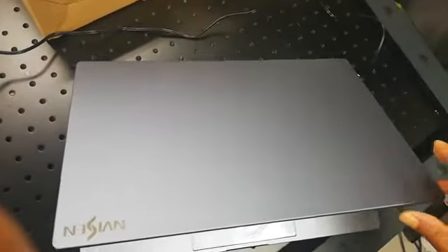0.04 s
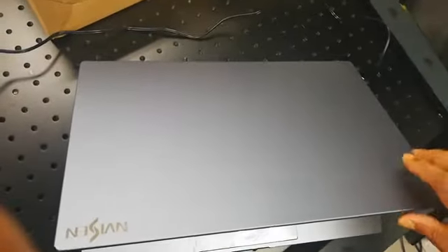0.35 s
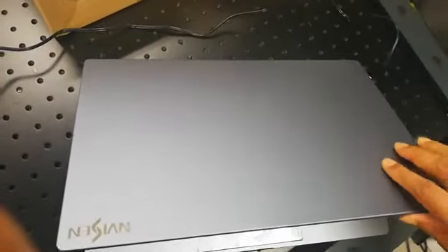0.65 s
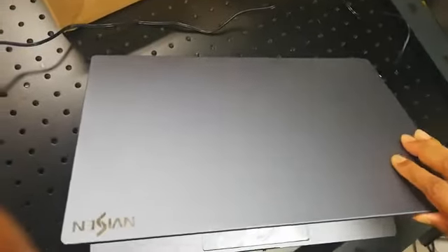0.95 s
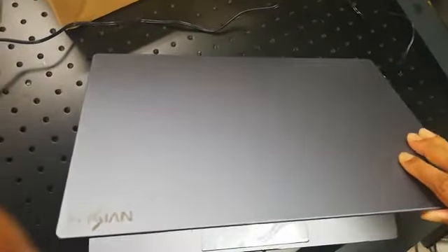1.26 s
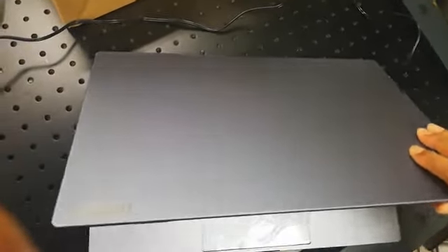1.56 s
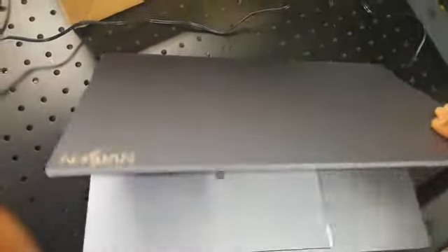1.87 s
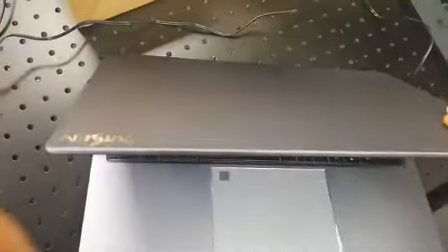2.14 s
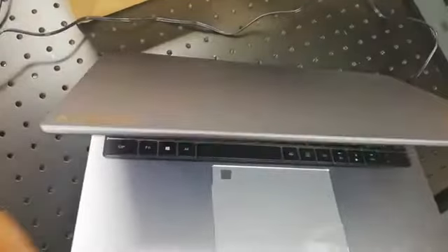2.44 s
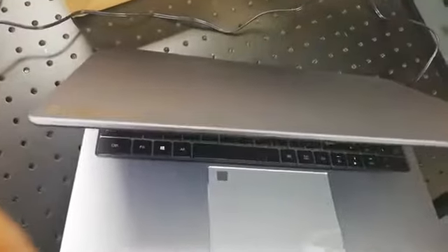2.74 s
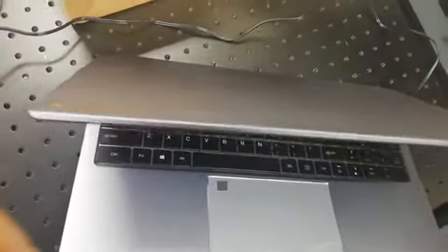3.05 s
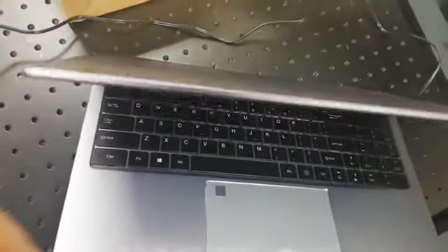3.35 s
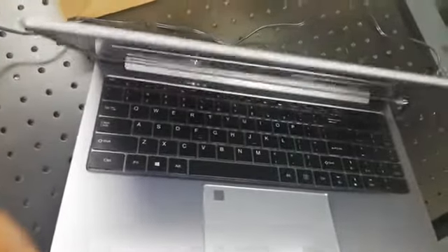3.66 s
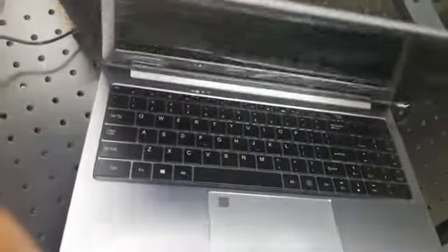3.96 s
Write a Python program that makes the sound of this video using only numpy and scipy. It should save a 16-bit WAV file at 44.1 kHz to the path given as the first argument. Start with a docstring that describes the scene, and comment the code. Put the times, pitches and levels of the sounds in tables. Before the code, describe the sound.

A laptop fan whirs, then winds down, with faint handling noises in a quiet room.

```python
"""A laptop's cooling fan whirs: air rushes through its duct, the blades sing a thin tone, the outlet
whistles faintly. Fingers start to brush the case, then the fan loses power and coasts down, its tones
falling and its air growing dull and quiet. The hinge rubs as the lid is lifted, the base knocks on the
table with a quick double contact, and the hinge rubs again. Under it all lie the ventilation rumble,
hiss and faint hums of a quiet room."""
import sys
import numpy as np
from scipy.fft import rfft, irfft
from scipy.io import wavfile

SR = 44100
rng = np.random.default_rng(int(sys.argv[2]) if len(sys.argv) > 2 else 0)


def output_pcm(signal):
    """Save a mono or channel-first signal as 16-bit PCM at the path in sys.argv[1].

    Samples are clipped to [-1, 1] before scaling.
    """
    pcm = np.clip(np.atleast_2d(signal).T, -1, 1) * 32767
    wavfile.write(sys.argv[1], SR, np.round(pcm).astype(np.int16))


N = 176400

# bright colour of a light touch on the case: freq_hz, relative_db
TOUCH_COLOUR = [(1000, -13), (4500, -9), (7000, -8), (8400, 0), (10800, 0), (12300, -13), (15000, -21)]
# stereo image of the room: freq_hz, correlation (-1..1), left_over_right_db
ROOM_IMAGE = [(45, 1, 0), (75, .998, 0), (120, .984, 0), (200, .92, -.4), (370, .14, 0), (690, -.5, .1),
              (1200, .12, -.4), (2300, -.11, 0), (8000, -.09, .3)]


def undb(db):
    """Decibels to gain."""
    return 10 ** (np.asarray(db) / 20)


def times():
    """Time of every sample in s."""
    return np.arange(N) / SR


def freqs():
    """Frequency of every spectral bin in Hz."""
    return np.maximum(np.arange(N // 2 + 1) * SR / N, 1)


def along(table):
    """Each column of a table joined by straight lines over log frequency."""
    hz, *columns = np.array(table, float).T
    return [np.interp(np.log(freqs()), np.log(np.sort(hz)), column) for column in columns]


def lifts(modes, at_hz):
    """Gain in dB of a set of resonances at the given frequencies."""
    return sum(db / (1 + (2 * (at_hz - hz) / width) ** 2) for hz, width, db in modes)


def highpass(hz):
    """Gain in dB of a steep bass cut."""
    return -10 * np.log10(1 + (hz / freqs()) ** 8)


def lowpass(hz):
    """Gain in dB of a steep treble cut."""
    return -10 * np.log10(1 + (freqs() / hz) ** 8)


def noise(colour_db, image=None):
    """Stereo coloured noise at rms 1; the image sets its width and balance."""
    correlation, pan_db = along(image) if image else (0, 0)
    correlation = np.clip(correlation, -1, 1)
    mid, side = rfft(rng.standard_normal((2, N)))
    sign = np.array([[1], [-1]])
    spectrum = mid * np.sqrt(1 + correlation) + sign * side * np.sqrt(1 - correlation)
    x = irfft(spectrum * undb(colour_db + sign * pan_db / 2), N)
    return x / x.std()


def drift(rate_hz):
    """Smooth random movement with spread 1."""
    x = irfft(rfft(rng.standard_normal(N)) / (1 + (freqs() / rate_hz) ** 4), N)
    return (x - x.mean()) / x.std()


def fader(table):
    """Gain that rides through points of time_s, gain_db."""
    return undb(np.interp(times(), *np.array(table, float).T))


def strike(start_s, t60_s, attack_s):
    """Envelope of a blow: quick rise, exponential fall."""
    age = np.maximum(times() - start_s, 0)
    return np.minimum(age / attack_s, 1) * np.exp(-np.log(1000) * age / t60_s)


def strokes(table, rise=.2, release=.55):
    """Envelope of short swells; rise and release are shares of their length."""
    t, envelope = times(), 0
    for start, length, db in table:
        fade_in = np.clip((t - start) / (rise * length), 0, 1)
        fade_out = np.clip((start + length - t) / (release * length), 0, 1)
        envelope += undb(db) * fade_in * fade_out
    return envelope


def fan_speed(power_off_s=1.148, drag_halving_s=1.0, friction_per_s=.024, wobble=.0005):
    """Share of full speed: steady until the power goes off, then air drag and the bearing brake it."""
    coasting_s = np.maximum(times() - power_off_s, 0)
    return (1 + wobble * drift(5)) / (1 + coasting_s / drag_halving_s) - friction_per_s * coasting_s


def fan_air(speed, level_db=-58, fall_db_per_decade=63.5, dulling_db_per_decade=59, split_hz=4400):
    """Turbulence rushes through the duct, weaker and duller as the fan slows."""
    # rushing air at full speed: freq_hz, relative_db
    colour = [(300, -11.5), (620, -7), (760, -1.2), (1100, -6.5), (1450, -7), (2300, -2.5), (3300, -0.5),
              (3900, -5), (5400, -3), (6400, -7.5), (7800, -8.5), (10000, -11.5), (11200, -19.5),
              (15000, -27)]
    # duct resonances: freq_hz, width_hz, lift_db
    duct_modes = [(717, 16, 4.5), (836, 26, 2.5), (976, 21, 3), (1240, 100, 5), (1446, 220, 6.5),
                  (1580, 50, 4), (1805, 70, 3), (2080, 80, 4), (2500, 53, 2), (2850, 38, 1.5),
                  (3380, 83, 0.5), (4220, 150, 0.5), (4610, 190, 2), (4950, 110, 0), (5760, 130, 0)]
    # stereo image of the air: freq_hz, correlation (-1..1), left_over_right_db
    image = [(570, -0.22, 4), (1293, 0.76, -2), (2500, -0.58, 1.5), (3480, 0.13, -2), (4330, -0.035, 4),
             (8000, -0.12, 1.5), (14100, 0.35, 5)]
    # slight swell and dip as the hand comes near: time_s, gain_db
    hand_ride = [(0, -0.9), (.55, -0.6), (.75, -0.2), (1.15, -1.3)]
    air = noise(along(colour)[0] + lifts(duct_modes, freqs()) + highpass(240), image)
    low = irfft(rfft(air) / (1 + (freqs() / split_hz) ** 2), N)
    decades = np.log10(speed)
    treble = (air - low) * undb(dulling_db_per_decade * decades)
    return (low + treble) * undb(level_db + fall_db_per_decade * decades) * fader(hand_ride)


def fan_tones(speed, full_speed_hz=2534, flutter_db=1.1):
    """Blades passing the outlet sing fluttering harmonics, coloured by the case as they fall."""
    # blade tones ahead of the case's colour: harmonic, level_db, fall_db_per_decade, left_over_right_db
    harmonics = [(1, -72.6, 56, -1.5), (2, -72.8, 102, 5), (3, -86, 110, .5)]
    # peaks and dips of the case: freq_hz, width_hz, lift_db
    case_modes = [(1430, 170, 5.5), (1570, 70, -6), (1950, 240, 2.5), (2175, 60, -8), (2385, 45, -10),
                  (4270, 240, -17), (4520, 220, 5.5), (4760, 130, 3), (4945, 60, -14)]
    # reflections shift the phase between left and right: pitch_hz, phase_rad
    stereo_phase = [(1300, .6), (1500, .2), (1580, 2.6), (1770, 2.6), (1860, 1), (2100, .5), (2220, 3),
                    (2550, 3), (4400, 2), (4580, 1.5), (4780, .2), (5070, .9), (7600, .7)]
    blade_hz = full_speed_hz * speed
    phase = 2 * np.pi * np.cumsum(blade_hz) / SR
    sign, tones = np.array([[1], [-1]]), 0
    for k, db, fall_db, pan_db in harmonics:
        lag = np.interp(k * blade_hz, *np.array(stereo_phase).T)
        level_db = db + fall_db * np.log10(speed) + lifts(case_modes, k * blade_hz)
        level_db += flutter_db * drift(12)
        tones += np.sqrt(2) * undb(level_db + sign * pan_db / 2) * np.sin(k * phase + sign * lag / 2)
    return tones


def outlet_whistles(speed, wander=.005, flutter_db=4, fall_db_per_decade=130, flare_hz=4610):
    """Air whistles faintly over the outlet's edges; the tones come and go, and die with the flow."""
    # edge tones at full speed: pitch_hz, level_db
    edge_tones = [(733, -81), (981, -81.5), (1416, -81), (1500, -81), (2060, -84), (2650, -84), (3388, -82),
                  (4590, -84.5)]

    def whistle(hz):
        """A tone whose pitch and stereo phase wander."""
        phase = 2 * np.pi * np.cumsum(hz * (1 + wander * drift(7))) / SR
        return np.sqrt(2) * np.sin(phase + np.array([drift(6), drift(6)]) / 2)

    chorus = sum(whistle(hz) * undb(db + flutter_db * np.tanh(drift(6))) for hz, db in edge_tones)
    # the top whistle flares while the hand is by the outlet: start_s, length_s, level_db
    flare = whistle(flare_hz) * strokes([(.91, .13, -73)])
    return (chorus + flare) * undb(fall_db_per_decade * np.log10(speed))


def finger_brushes(grain_db=2):
    """Fingers slide over the case in short, bright, grainy wisps."""
    # finger strokes: start_s, length_s, level_db
    brushes = [(.715, .09, -70), (.815, .055, -70), (.945, .04, -72), (1.283, .035, -71.5),
               (2.032, .031, -65), (2.298, .03, -74), (3.285, .04, -72), (3.45, .028, -74)]
    friction = noise(along(TOUCH_COLOUR)[0] + highpass(600))
    return friction * strokes(brushes) * undb(grain_db * drift(300))


def hinge_rubs(grain_db=2):
    """Friction excites the hinge's resonances as the lid rises."""
    # hinge movements: start_s, length_s, level_db
    rubs = [(2.285, .07, -67.8), (3.25, .1, -70.5)]
    # hinge resonances: freq_hz, width_hz, lift_db
    hinge_modes = [(1785, 130, 17), (3400, 500, 3.5), (7600, 480, 7), (9500, 1400, 5)]
    friction = noise(lifts(hinge_modes, freqs()) + highpass(900) + lowpass(7100))
    return friction * strokes(rubs) * undb(grain_db * drift(150))


def base_knock(thump_db=-48.7, scuff_db=-61, tick_db=-60.5):
    """The base settles on the table in two quick contacts: soft thumps, dull scuffs and a tick."""
    # low resonances of the base: freq_hz, width_hz, lift_db
    base_modes = [(125, 70, 18), (190, 55, 13), (255, 70, 7.5), (360, 75, 7)]
    # contacts with the table: start_s, thump_trim_db, scuff_trim_db
    contacts = [(2.547, -3, 0), (2.566, 0, -6)]
    thump = noise(lifts(base_modes, freqs()) + highpass(88) + lowpass(420), ROOM_IMAGE)
    thump *= sum(undb(thump_db + db) * strike(s, t60_s=.15, attack_s=.006) for s, db, _ in contacts)
    scuff = noise(highpass(330) + lowpass(1300))
    scuff *= sum(undb(scuff_db + db) * strike(s, t60_s=.1, attack_s=.0035) for s, _, db in contacts)
    tick = noise(along(TOUCH_COLOUR)[0] + highpass(600))
    tick *= undb(tick_db) * strike(start_s=2.556, t60_s=.018, attack_s=.00071)
    return thump + scuff + tick


def ventilation(rumble_db=-53, hiss_db=-65.5, motor_hz=48.25, motor_db=-52, waver_db=1.7):
    """The ventilation's rumble and motor drone swell together under an even, hollow hiss."""
    # deep rumble: freq_hz, relative_db
    rumble_colour = [(18, -13), (28, -0.2), (34, -7.5), (46, -3), (60, -9.5), (71, -7), (87, -14.5),
                     (108, -15.5), (127, -9), (150, -17), (195, -14), (215, -21.5), (280, -30), (400, -36)]
    # slow swell of rumble and drone: time_s, gain_db
    swell = [(0, -1.2), (.8, -1.1), (1.25, 0.9), (1.75, -2), (2.2, -0.3), (2.8, -0.5), (3.1, 0.5),
             (3.55, 0.9), (4, 0.5)]
    # room hiss: freq_hz, relative_db
    hiss_colour = [(250, 1.5), (400, -1), (620, -9.5), (850, -4), (1150, -4), (1400, -5), (1800, -7),
                   (3200, -8.5), (4700, -9.5), (5600, -11), (10000, -11.5), (11300, -16), (15000, -17.5)]
    # hollow resonances in the hiss: freq_hz, width_hz, lift_db
    vent_modes = [(498, 9.2, 10.5), (545, 12.6, 10), (577, 19, 10), (700, 110, 5.5), (713, 24, 4.5),
                  (825, 8.9, 6), (1203, 86, 0)]
    rumble = noise(along(rumble_colour)[0] + highpass(7.5) + lowpass(340), ROOM_IMAGE)
    hiss = noise(along(hiss_colour)[0] + lifts(vent_modes, freqs()) + highpass(243), ROOM_IMAGE)
    motor_gain = np.sqrt(2) * undb(motor_db + waver_db * drift(2.5))
    motor = motor_gain * np.sin(2 * np.pi * motor_hz * times() + .11 * drift(.91))
    return (undb(rumble_db) * rumble + motor) * fader(swell) + undb(hiss_db) * hiss


def machine_hums(waver_db=3, drift_rad=.2):
    """Machines in the room hum faintly, each wavering in level and phase."""
    # hum tones: pitch_hz, level_db
    hum_tones = [(100, -78.5), (180.5, -77), (198.5, -74.5), (244, -83), (331, -84), (395.5, -87.5)]
    hums = 0
    for hz, db in hum_tones:
        gain = np.sqrt(2) * undb(db + waver_db * drift(2.16))
        hums += gain * np.sin(2 * np.pi * hz * times() + drift_rad * drift(2))
    return hums


def scene():
    """The fan, the hands on the laptop and the room tone."""
    speed = fan_speed()
    fan = fan_air(speed) + fan_tones(speed)
    handling = finger_brushes() + hinge_rubs() + base_knock()
    room_tone = ventilation() + machine_hums()
    return fan + outlet_whistles(speed) + handling + room_tone


def record(dry, top_hz=15000):
    """A steep cut takes off the very top of the mix."""
    return irfft(rfft(dry) * np.clip((top_hz - freqs()) / 50, 0, 1), N)


dry = scene()
out = record(dry)
output_pcm(out)
```